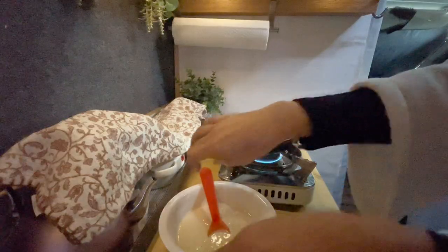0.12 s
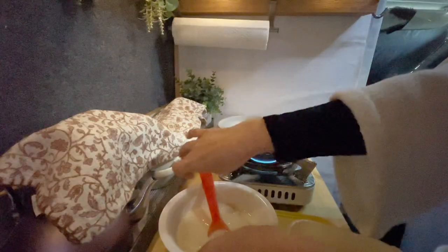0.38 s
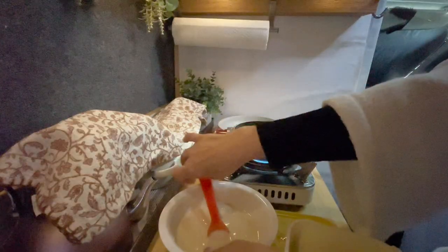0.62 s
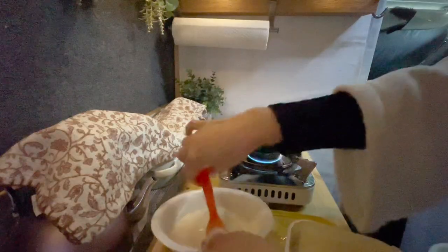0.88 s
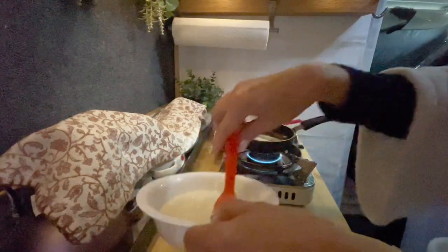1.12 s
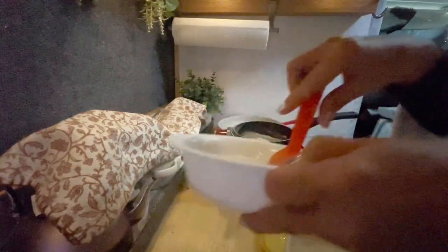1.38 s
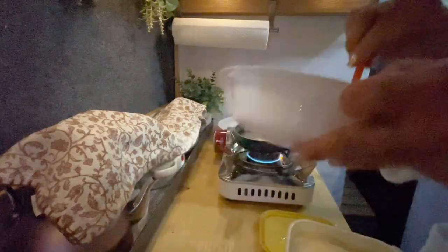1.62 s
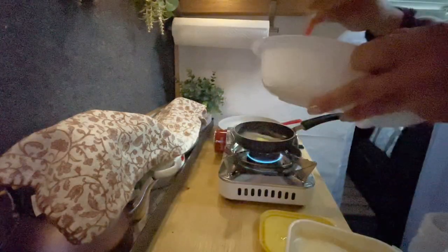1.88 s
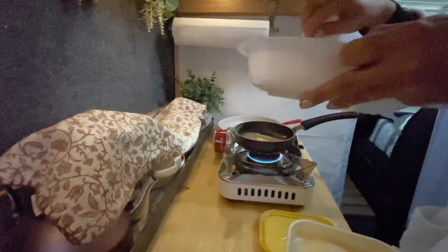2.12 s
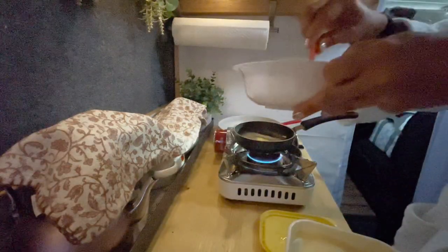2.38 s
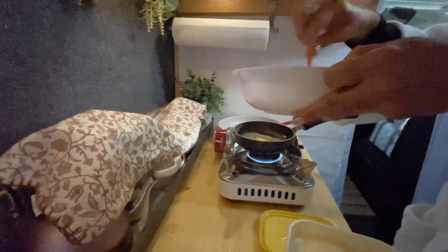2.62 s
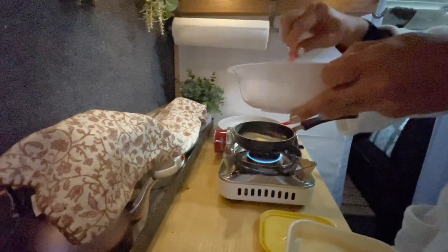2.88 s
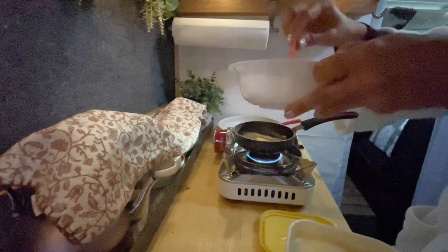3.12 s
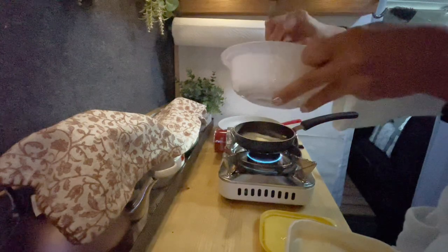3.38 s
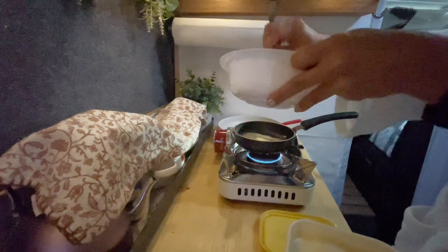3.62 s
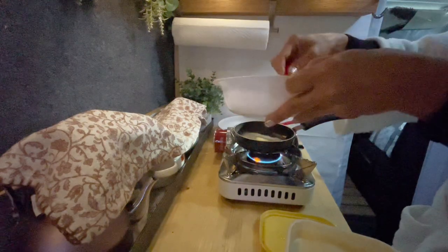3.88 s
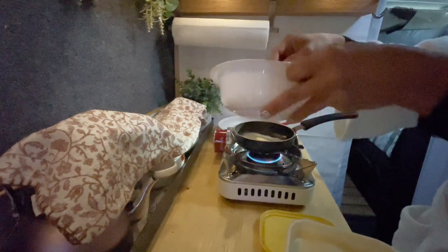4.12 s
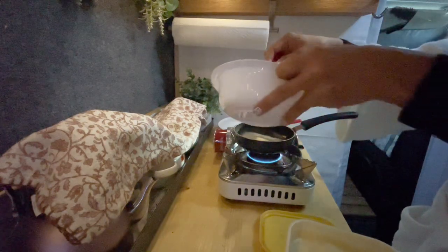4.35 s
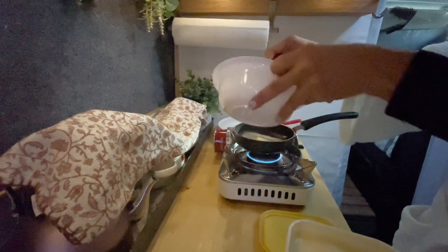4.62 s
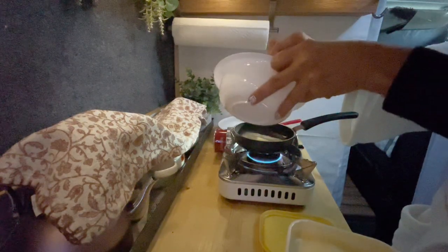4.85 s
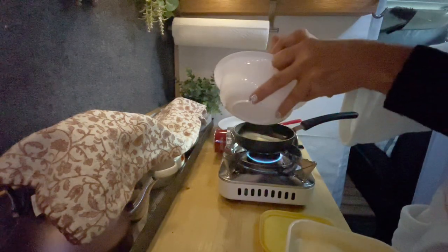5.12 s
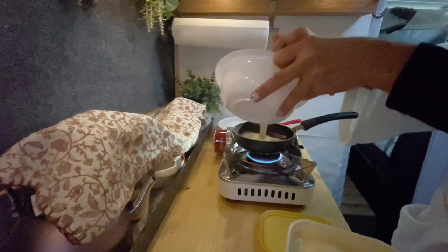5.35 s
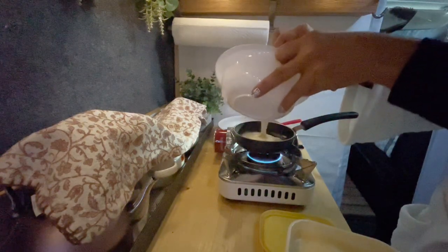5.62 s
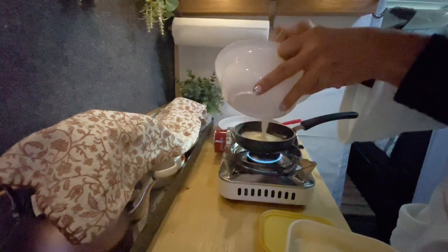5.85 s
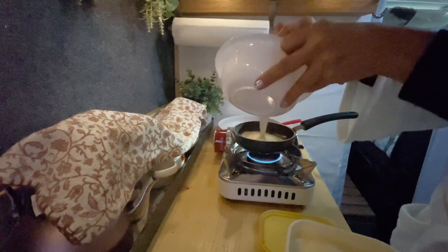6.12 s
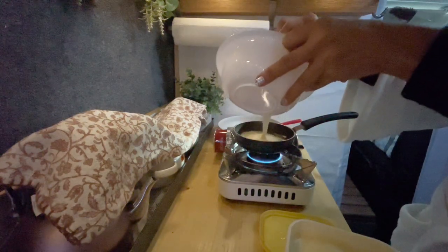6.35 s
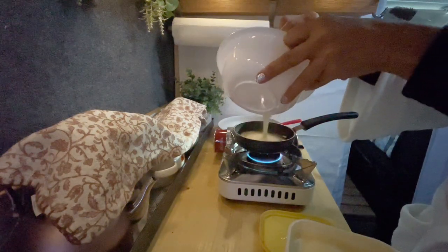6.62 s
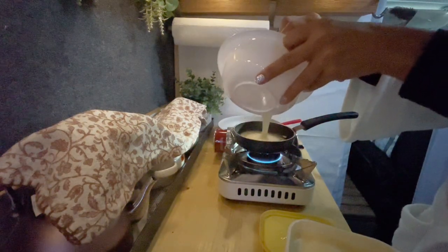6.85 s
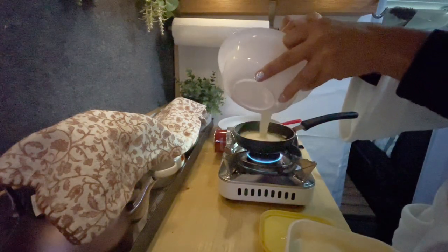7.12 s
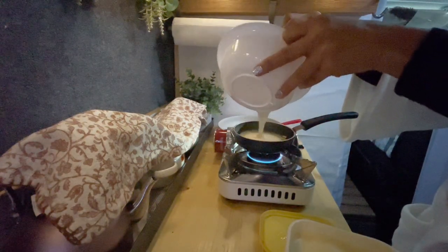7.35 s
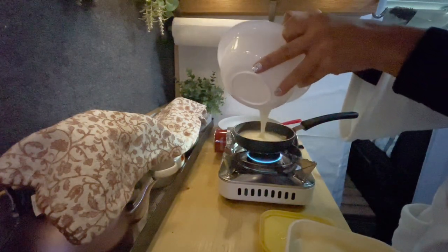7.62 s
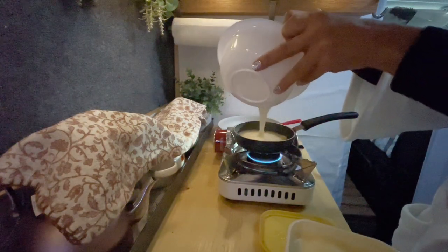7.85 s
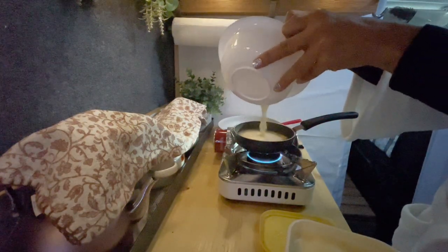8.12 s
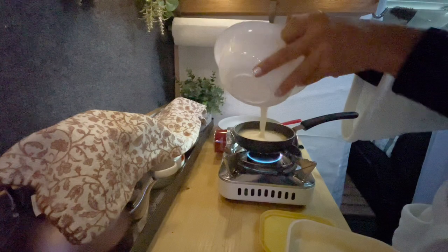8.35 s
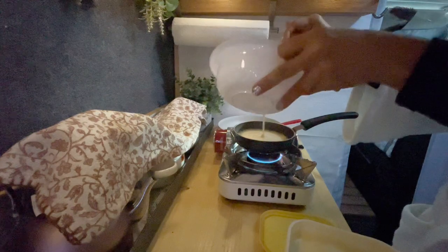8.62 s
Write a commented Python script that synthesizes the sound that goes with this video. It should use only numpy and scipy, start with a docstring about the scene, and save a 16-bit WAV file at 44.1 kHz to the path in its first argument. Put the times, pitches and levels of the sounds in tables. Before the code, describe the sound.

Batter is poured into a small sizzling pan over a gas flame, fat spitting, spoon knocking a plastic bowl, low wavering traffic hum in a van.

```python
"""Butter sizzles and spits in a small pan over a gas flame in a van kitchen: shaped noise, bursts and damped tones.
From the start, traffic rumble (filtered noise) booms in the cabin and a low hum (sine lines) wavers.
Soon a plastic spoon knocks and drags on its bowl, heard as ringing modes and grainy noise.
The breath of the burner, narrow-band noise, sinks in the first seconds; batter poured in later swells the sizzle."""
import sys
import numpy as np
from scipy import signal
from scipy.fft import rfft, irfft, next_fast_len
from scipy.io import wavfile
from scipy.ndimage import uniform_filter1d, map_coordinates

SR = 44100
rng = np.random.default_rng(int(sys.argv[2]) if len(sys.argv) > 2 else 0)


def wav_out(sig):
    """Save sig, one row per channel (or a flat mono array), as 16-bit PCM at SR to the path in sys.argv[1]."""
    wavfile.write(sys.argv[1], SR, np.round(np.clip(np.atleast_2d(sig).T, -1, 1) * 32767).astype(np.int16))


def voltage_ratio(decibels):
    """Convert decibels (scalar or array-like) to amplitude ratios, 20 dB per decade."""
    exponent = np.asarray(decibels, float) / 20
    return 10 ** exponent


N = 384993


def unit(x):
    """Normalisation: scale to rms 1."""
    return x / np.sqrt(np.mean(x ** 2) + 1e-20)


def along(points, hz):
    """Interpolation of (Hz, value) points on a logarithmic frequency axis."""
    point_hz, value = np.transpose(points)
    return np.interp(np.log(hz + 1), np.log(point_hz + 1), value)


def curves(rows):
    """Linear interpolation in time: one value per sample for each column after the seconds."""
    s, *columns = np.transpose(rows)
    return [np.interp(np.arange(N) / SR, s, column) for column in columns]


def wobble(rate):
    """Slow random modulation: a smooth curve through `rate` random knots a second."""
    knots = rng.standard_normal(int(N * rate / SR) + 4)
    return map_coordinates(knots, [np.arange(N) * rate / SR])


def arch(s, length):
    """Amplitude envelope: a half-cosine swell centred on time s."""
    return np.cos(np.pi * np.clip((np.arange(N) / SR - s) / length, -.5, .5))


def filtered(x, response):
    """Linear filtering: multiply the spectrum by a complex response of frequency."""
    m = next_fast_len(N + 8192)
    return irfft(rfft(x, m) * response(np.fft.rfftfreq(m, 1 / SR)), m)[..., :N]


def resonance(hz, centre, width):
    """Second-order resonance: a complex band-pass response, 1 at its centre."""
    return 1j * hz * width / (centre * centre - hz * hz + 1j * hz * width)


def patchy(patchy_db):
    """Time-frequency modulation: two unrelated noises under shared patches of random gain."""
    z = signal.stft(rng.standard_normal((2, N)), nperseg=512)[2]
    field = uniform_filter1d(rng.standard_normal(z.shape[1:]), size=10, axis=0)
    field = uniform_filter1d(field, size=5, axis=1)
    return signal.istft(z * voltage_ratio(patchy_db * unit(field)), nperseg=512)[1][:, :N]


def spread(pair, spectrum, alike):
    """Interaural coherence: colour two unrelated signals and mix them to a stereo pair of rms 1."""
    def weights(hz):
        turn = np.arccos(np.clip(along(alike, hz), -1, 1)) / 2
        return voltage_ratio(along(spectrum, hz)) * [np.cos(turn), np.sin(turn)]
    mid, side = filtered(pair, weights)
    return unit(np.array([mid + side, mid - side]))


def add(out, sound, s, pan_db):
    """Superposition: put a sound in at time s, panned by level difference (left over right)."""
    out[:, round(s * SR):][:, :len(sound)] += sound * voltage_ratio([[pan_db / 2], [-pan_db / 2]])


def bursts(rate, spread_db, life_s):
    """Random impulses of bursting bubbles: sudden start, exponential decay, sizes spread up to a cap."""
    when, size = rng.random((int(rate * N / SR), 2)).T
    kicks = np.bincount((when * N).astype(int), voltage_ratio(-spread_db * np.log(1 - .97 * size)), N)
    return unit(signal.lfilter([1], [1, -np.exp(-1 / (life_s * SR))], kicks))


def bubbles(rate, centre_hz, cycles, spread_db):
    """Damped oscillation of single bubbles: short tones of scattered pitch, size and place."""
    when, size, side, pitch = rng.random((int(rate * N / SR), 4)).T[..., None]
    hz = np.clip(centre_hz * np.exp(2.2 * (pitch - .5)), 1200, 15000)
    t = np.arange(SR // 200) / SR
    ring = np.sin(2 * np.pi * hz * t) * np.exp(-t * hz / cycles)
    grain = voltage_ratio(-spread_db * np.log(1 - .98 * size)) * ring
    where = ((when * N).astype(int) + np.arange(len(t))).ravel()
    turn = 2 * np.pi * side
    return unit(np.array([np.bincount(where, (grain * f(turn)).ravel(), N)[:N] for f in (np.cos, np.sin)]))


# Course of the frying. Each row: time in seconds, fat fizz in dB, batter steam in dB (both before
# the flurries and the metal's modes), gain of the top treble in dB.
FRYING = [(0, -41.5, -50.5, -1), (1.63, -42.5, -51.5, 0), (1.92, -39, -62, 0.5), (2.84, -40, -68, -0.5),
          (4.8, -41, -53.5, 0.5), (5.54, -42, -48.5, -1.5), (5.74, -40.5, -41, -5), (5.97, -33, -36.5, -2),
          (6.15, -33, -36.5, -1), (7.29, -33.5, -33.5, 1), (8.1, -36.5, -35.5, 3), (8.44, -37, -38.5, 3),
          (8.73, -34.5, -40.5, 1.5)]
# Spectrum of the fat. Each row: frequency in Hz, relative density in dB per Hz.
FAT_SPECTRUM = [(1200, -18), (1500, -20.5), (2000, -16), (2700, -15), (3400, -11.5), (4200, -1.5),
                (5200, -2.5), (6400, -2), (8200, -3), (10000, -6.5), (11700, -5.5), (14500, -9),
                (17000, -30)]
# Spectrum of the batter. Each row: frequency in Hz, relative density in dB per Hz.
BATTER_SPECTRUM = [(1200, -16), (1700, -14.5), (2050, -3.5), (3000, -2.5), (5100, -2.5), (8000, -2.5),
                   (12000, -4.5), (17000, -3.5)]
# Stereo coherence of the hiss ahead of the ports. Each row: frequency in Hz, left-right likeness.
HISS_LIKENESS = [(1200, 0.33), (2000, 0.083), (2100, 0.9), (2550, 0.82), (2700, 0.52), (4000, 0.18),
                 (8500, 0.073), (10000, 0.67), (12500, 1)]
# Modes of pan and stove. Each row: frequency in Hz, width in Hz, lift in dB.
METAL_MODES = [(1436, 72, 10.5), (2006, 60, 5.5), (2573, 30, 5.5), (2850, 84, 7), (3000, 83, 5.5),
               (3340, 62, 5.5), (3850, 100, 3.5), (4000, 98, 2), (4640, 74, 3.5), (5180, 140, 3.5),
               (6450, 160, 2.5), (6910, 180, 4)]


def sizzle():
    """Random superposition: countless tiny bubbles fuse to a hiss; larger ones crackle out, in flurries."""
    fizz_db, steam_db, top_db = curves(FRYING)
    flurry = wobble(10)
    crackle = .26 * voltage_ratio(.6 * flurry) * bursts(60, spread_db=2.5, life_s=.003)
    fat = patchy(patchy_db=1.5) * (1 + crackle)
    fat = fat + .3 * bubbles(400, 6120, cycles=2.3, spread_db=.5)
    batter = patchy(patchy_db=1.0) + .32 * bubbles(1200, 5180, cycles=1.64, spread_db=2.0)
    fizz = voltage_ratio(fizz_db + .11 * flurry) * spread(fat, FAT_SPECTRUM, HISS_LIKENESS)
    steam = voltage_ratio(steam_db + .19 * wobble(11)) * spread(batter, BATTER_SPECTRUM, HISS_LIKENESS)
    hiss = fizz + steam
    hiss = hiss + (voltage_ratio(top_db) - 1) * filtered(hiss, lambda hz: hz > 10500)
    # the smallest bubbles come in flurries of their own
    finest = filtered(hiss, lambda hz: hz / (hz + 9000))
    metal = lambda hz: 1 + sum((voltage_ratio(db) - 1) * resonance(hz, c, w) for c, w, db in METAL_MODES)
    return filtered(hiss + .22 * wobble(14) * finest, metal)


# Level of the gas jet. Each row: time in seconds, level in dB before its breathing.
JET_LEVEL = [(0, -60.5), (1, -59), (2.2, -64), (4, -71), (8.73, -71)]
# The burner's breathy band. Each row: frequency in Hz, relative density in dB per Hz.
JET_SPECTRUM = [(900, -53), (1300, -17), (1550, 7.5), (1750, 1.5), (2400, -51)]
# Stereo coherence of flame, outside and rubs. Each row: frequency in Hz, left-right likeness.
WIDE_LIKENESS = [(60, 0.97), (140, 0.87), (210, 0.24), (330, 0.12), (500, 0.31), (770, -0.079),
                 (1150, -0.53), (1500, -0.046)]


def flame():
    """Jet noise: the gas breathes in a narrow band, louder while nothing hides the burner."""
    breath_db = curves(JET_LEVEL)[0] + .91 * wobble(3.0)
    return voltage_ratio(breath_db) * spread(patchy(patchy_db=2.0), JET_SPECTRUM, WIDE_LIKENESS)


# Course of the traffic. Each row: time in seconds, boom in dB, murmur in dB before its wavering.
TRAFFIC = [(0, -51, -62), (.58, -49.5, -62), (.8, -43.5, -58), (1.0, -46.5, -62.5), (1.9, -46.5, -56),
           (3.6, -45.5, -56.5), (4.7, -43.5, -52), (6.15, -43, -50), (6.8, -44, -53), (8.1, -43, -49),
           (8.73, -43, -51)]
# Spectrum of the boom. Each row: frequency in Hz, relative density in dB per Hz.
BOOM_SPECTRUM = [(21, -47), (36, -11.5), (54, -3.5), (102, -3.5), (118, -9.5), (135, -6.5), (165, -15.5),
                 (205, -14), (240, -17.5), (290, -18), (340, -25.5), (400, -30), (520, -51), (880, -120)]
# Spectrum of the murmur. Each row: frequency in Hz, relative density in dB per Hz.
MURMUR_SPECTRUM = [(180, -77), (300, 1), (345, -30), (384, -0.5), (484, 3.5), (544, -6.5), (844, 3),
                   (1080, -2), (1430, -6.5), (1630, -11), (1900, -10.5), (2470, -29), (4180, -120)]


def outside():
    """Transmission: far traffic comes through the walls as filtered noise, boom and murmur."""
    boom_db, murmur_db = curves(TRAFFIC)
    boom = voltage_ratio(boom_db) * spread(patchy(patchy_db=1.3), BOOM_SPECTRUM, WIDE_LIKENESS)
    murmur = spread(patchy(patchy_db=1.5), MURMUR_SPECTRUM, WIDE_LIKENESS)
    return boom + voltage_ratio(murmur_db + .52 * wobble(4.7)) * murmur


def tone(notes, waver_db, drift):
    """Amplitude and phase modulation of low lines (pitch, gain per sample), nearly alike on both sides."""
    stray = drift * wobble(12) + .11 * np.array([wobble(2.9), wobble(4.4)])
    lines = np.zeros((2, N))
    for hz, gain in notes:
        phase = 2 * np.pi * np.cumsum(hz) / SR + stray
        lines += gain * np.sin(phase, where=gain > 1e-9, out=np.zeros((2, N)))
    return voltage_ratio(waver_db * wobble(14) + [[.6], [-.6]]) * lines


# The lasting line. Each row: time in seconds, pitch in Hz, level in dB before its wavering.
HUM_LINE = [(0, 91.3, -51), (.2, 91.85, -44.5), (1.0, 92.5, -44.5), (1.5, 94.5, -52.5), (1.67, 93.6, -39),
            (2.0, 93.8, -43), (2.16, 95.8, -53), (2.35, 95.1, -42.5), (3.3, 95, -44), (3.95, 97.6, -37.5),
            (4.1, 98.6, -31.5), (4.5, 98.9, -34.5), (4.66, 98.4, -50), (5.08, 95.7, -35.5),
            (5.3, 96, -50.5), (6.45, 96, -49), (7.05, 99.3, -39.5), (7.25, 99.7, -57), (7.7, 98.1, -40.5),
            (8.05, 97.7, -33.5), (8.22, 96, -43), (8.32, 95.8, -34), (8.73, 98, -39.5)]
# Deeper notes. Each row: middle in seconds, length in seconds, pitch at the middle in Hz,
# glide in Hz per second, peak in dB before wavering.
DEEP_NOTES = [(0.358, 0.27, 69, -5, -44), (1.15, 0.42, 69, 4, -46), (1.854, .7, 53, 8, -45.5),
              (2.6, 0.38, 72, 0.5, -45), (4.147, 1.36, 67, 3.5, -42), (4.869, 0.44, 69, 0, -40.5),
              (5.349, .9, 53, 1, -51), (6.499, 1.08, 66, 4, -44), (7.4, .8, 59, 14.5, -39.5),
              (8.102, 0.64, 62, 2, -34.5), (8.5, 0.64, 63, 1.5, -34)]


def hum():
    """Additive synthesis: one low line sounds throughout; deeper notes swell and fade below it."""
    t = np.arange(N) / SR
    hz, db = curves(HUM_LINE)
    notes = [(pitch + glide * (t - s), voltage_ratio(peak) * arch(s, length))
             for s, length, pitch, glide, peak in DEEP_NOTES]
    line = tone([(hz, voltage_ratio(db))], waver_db=1.5, drift=.43)
    return line + tone(notes, waver_db=2.0, drift=.45)


# The larger spits. Each row: start in seconds, level in dB ahead of the high-pass, centre in Hz.
LARGE_SPITS = [(.2254, -26, 4560), (1.9475, -28, 4500), (2.045, -27, 4400), (2.168, -26, 5145),
               (2.2322, -29, 4160), (2.537, -27, 11900), (2.6015, -27.5, 4840), (3.373, -29, 3850),
               (3.6343, -19.5, 7000), (3.781, -19.5, 4304), (4.263, -22.5, 6430), (4.3166, -22, 7970),
               (4.362, -18.5, 4570), (4.6347, -19.5, 5240), (5.065, -28, 11520), (5.398, -27, 3600),
               (5.447, -26, 3000), (5.5093, -17, 3800), (5.5849, -26, 2810), (5.687, -18.5, 7030),
               (5.752, -22.5, 2430), (5.778, -23, 4480), (5.914, -16, 5260), (6.178, -19, 12960),
               (6.5919, -18, 11940), (8.49, -15, 12710), (8.6934, -24, 4510)]


def spits():
    """Vapour explosion: water cracks in the fat, then spray hisses at the bubble's pitch; lesser ones at random."""
    out, t = np.zeros((2, N + SR)), np.arange(SR // 40) / SR
    rate_per_s, small_db, scatter_db, small_hz = 14, -31.5, 2.5, 4960
    when, size, pitch = rng.random((int(rate_per_s * N / SR), 3)).T
    db_each = small_db + scatter_db * (2 * size - 1)
    hz_each = small_hz * np.exp(1.7 * (pitch - .4))
    for s, db, hz in [*LARGE_SPITS, *zip(when * N / SR, db_each, hz_each)]:
        crack, hiss = rng.standard_normal((2, len(t)))
        ring = np.sin(2 * np.pi * hz * t) * voltage_ratio(-60 * t / .0045)
        spray = unit(np.convolve(hiss, ring[:200])[:len(t)]) * voltage_ratio(-60 * t / .017)
        body = (np.cos(2 * np.pi * hz * t) * np.exp(-hz * t))[:100]
        snap = unit(crack + np.convolve(crack, body)[:len(t)]) * voltage_ratio(-60 * t / .007)
        add(out, voltage_ratio(db) * (.6 * snap + .6 * ring + .3 * spray), s, pan_db=1)
    return filtered(out[:, :N], lambda hz: (1j * hz / (1800 + 1j * hz)) ** 2)


# The bowl slides and the spoon drags. Each row: middle in seconds, length in seconds,
# peak in dB before the grain.
STROKES = [(0.841, 0.28, -49.5), (1.471, .25, -54)]
# Spectrum of the scrape. Each row: frequency in Hz, relative density in dB per Hz.
RUB_SPECTRUM = [(90, -60), (125, -3), (195, -1), (260, -19), (520, -28), (635, -13), (760, -29),
                (1100, -14), (1500, -32), (2500, -80)]


def rubs():
    """Friction noise: a dull scrape, its grain a fast random modulation under a rounded stroke."""
    stroke = sum(voltage_ratio(db) * arch(s, length) for s, length, db in STROKES)
    scrape = spread(rng.standard_normal((2, N)), RUB_SPECTRUM, WIDE_LIKENESS)
    return stroke * voltage_ratio(2.5 * wobble(45)) * scrape


# Blows of the spoon. Each row: time in seconds, level in dB, centre in Hz, gain of the click in dB.
BLOWS = [(.808, -43, 633, 6), (.838, -46, 369, 2), (.889, -38, 850, -6), (1.059, -43, 896, 0),
         (1.568, -42.5, 1440, 8), (3.541, -38, 1700, 3), (1.017, -24, 1080, 0), (1.123, -30, 1100, 5),
         (1.9305, -29, 480, -2), (3.343, -35, 900, -14)]
# Contacts in one blow. Each row: offset in seconds from the blow before random stretching, strength.
CONTACTS = [(-.0008, .4), (.0002, 1), (.0033, .5), (.0056, .45)]
# Modes of the bowl. Each row: frequency in Hz, relative level in dB, 60 dB decay time in seconds.
BOWL_MODES = [(260, -5, .03), (440, 0, .025), (620, -1, .02), (780, -1, .02), (950, 1, .022),
              (1234, 2, .028), (1500, 1, .022), (1950, 0, .018), (2850, -1, .015), (3700, -1, .012)]


def knocks():
    """Modal excitation: the spoon chatters; each contact clicks and rings modes near the blow's centre."""
    out, t = np.zeros((2, N + SR)), np.arange(SR // 10) / SR
    for s, db, centre_hz, click_db in BLOWS:
        for late_s, strength in CONTACTS:
            ring = np.zeros(len(t))
            for hz, level, t60 in BOWL_MODES:
                weight_db = rng.normal(0, 2) - 15 * np.log2(hz / centre_hz) ** 2
                ring += voltage_ratio(level + weight_db - 60 * t / t60) * np.sin(2 * np.pi * hz * t)
            grit = rng.standard_normal(len(t))
            grit = uniform_filter1d(grit, size=4) - uniform_filter1d(grit, size=24)
            click = grit * voltage_ratio(click_db - 60 * t / .0072)
            blow = voltage_ratio(db) * strength * (ring / abs(ring).max() + click)
            add(out, blow, s + late_s * rng.uniform(.837, 1.19), pan_db=5.5)
    return out[:, :N]


# Decay of the cabin. Each row: frequency in Hz, 60 dB decay time in seconds.
CABIN_DECAY = [(300, 0.13), (3000, 0.051), (12000, 0.028)]


def cabin(x):
    """Reverberation: convolve with the van's short noise tail, each frequency dying at its own speed."""
    hz, t, z = signal.stft(rng.standard_normal((2, SR // 4)), SR, nperseg=256)
    decay = voltage_ratio(-60 * t / along(CABIN_DECAY, hz)[:, None])
    tail = signal.istft(z * decay, SR, nperseg=256)[1]
    late = np.pad(x, ((0, 0), (90, 0)))  # the tail starts 2 ms late
    return signal.fftconvolve(late, tail / np.linalg.norm(tail[0]), axes=1)[:, :N]


# Phase between the ports. Each row: frequency in Hz, lead of the left port in radians.
PORT_LEAD = [(7000, 0), (8500, -np.pi), (9800, -3.5), (12500, -5.7)]


def ports(pair):
    """Phase difference: the housing turns the treble of one port against the other."""
    return filtered(pair, lambda hz: np.exp(np.outer([.5j, -.5j], along(PORT_LEAD, hz))))


def scene():
    """Superposition of pan, burner, bowl and street; only spits and knocks feed the cabin's tail."""
    fry, jet, street, low = sizzle(), flame(), outside(), hum()
    hits = spits() + knocks()
    return ports(fry + hits) + voltage_ratio(-7.5) * cabin(hits) + rubs() + jet + street + low


def band_limit(x):
    """A steep low-pass at the top of the band."""
    return signal.sosfilt(signal.butter(12, 15950, fs=SR, output="sos"), x)


# Notches of the microphone housing. Each row: frequency in Hz, width in Hz, depth from 0 to 1.
HOUSING_NOTCHES = [(5560, 780, 0.6), (7480, 1430, 0.62), (1590, 116, 0.13)]
# Balance of the two sides. Each row: frequency in Hz, left over right in dB.
SIDE_BALANCE = [(60, 2.5), (110, -1), (200, 4.5), (380, -0.5), (700, 0.5), (1290, 3), (2380, 1),
                (4400, 2.5), (8120, -1.5), (15000, 2)]


def record(dry):
    """Resonant absorption and level difference: the housing notches and leans the sound; the top is mono."""
    def housing(hz):
        notch = np.prod([1 - depth * resonance(hz, c, w) for c, w, depth in HOUSING_NOTCHES], axis=0)
        return (hz < 15950) * notch * voltage_ratio(np.outer([.5, -.5], along(SIDE_BALANCE, hz)))
    left, right = filtered(dry, housing)
    mid = (left + right) / 2
    side = filtered((left - right) / 2, lambda hz: hz < 12950)
    return band_limit(np.array([mid + side, mid - side]))


dry = scene()
out = record(dry)
wav_out(out)
```